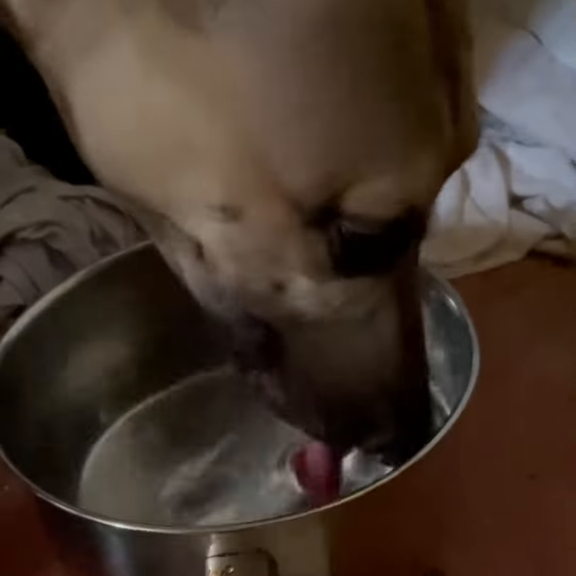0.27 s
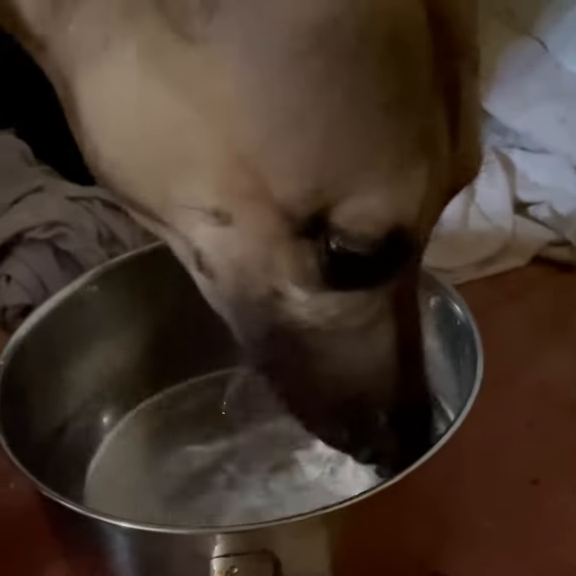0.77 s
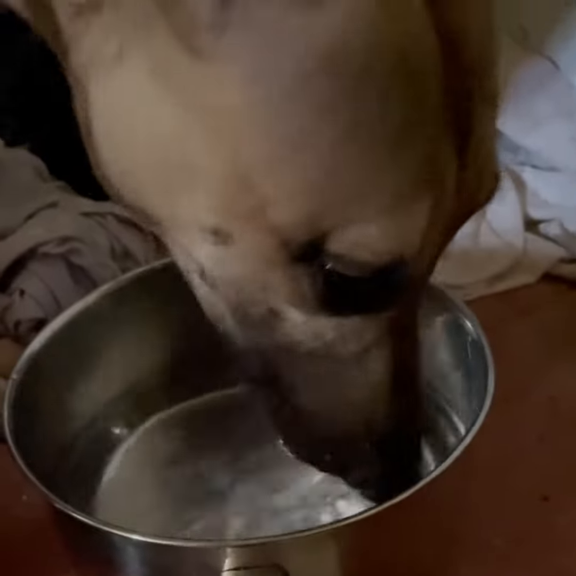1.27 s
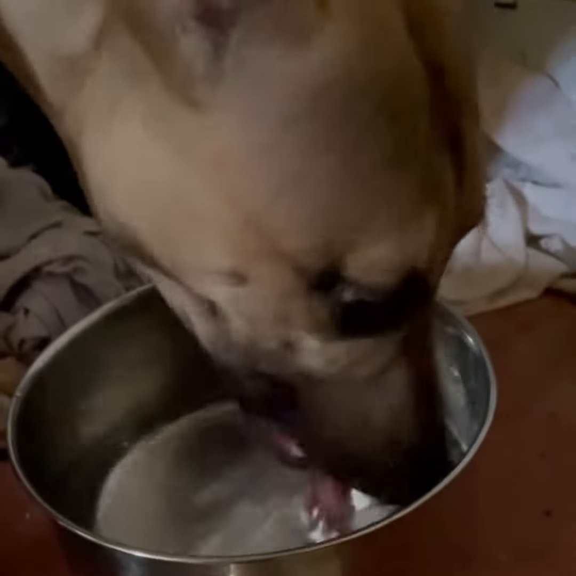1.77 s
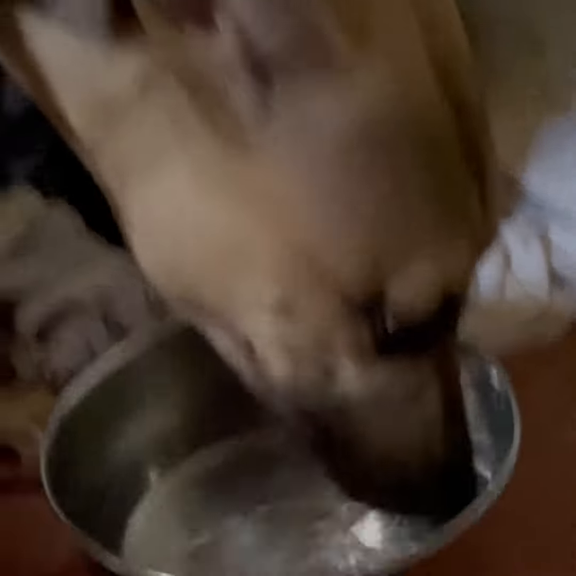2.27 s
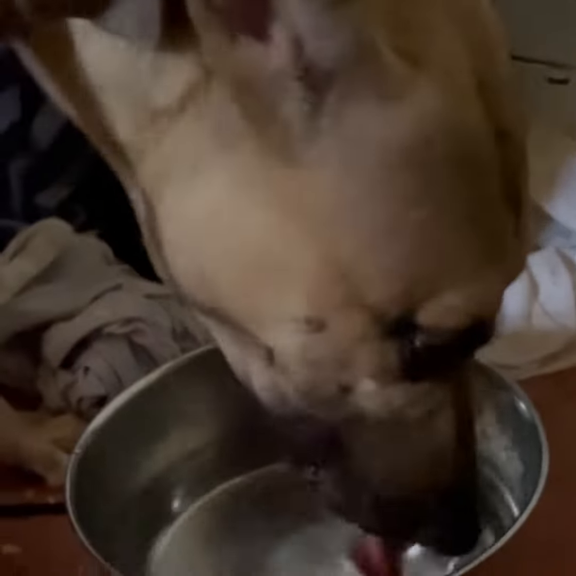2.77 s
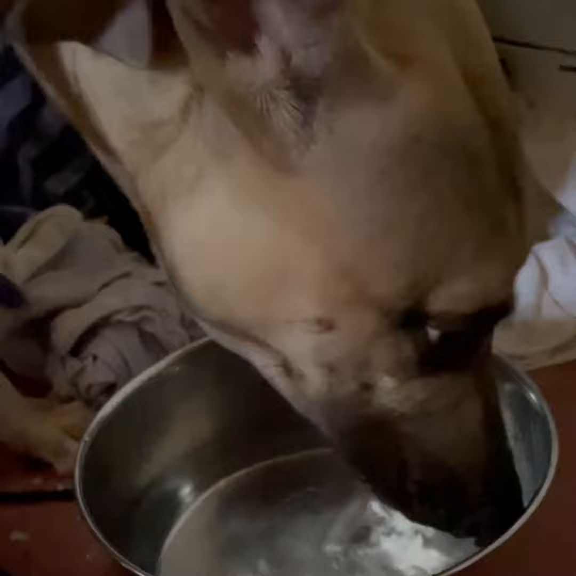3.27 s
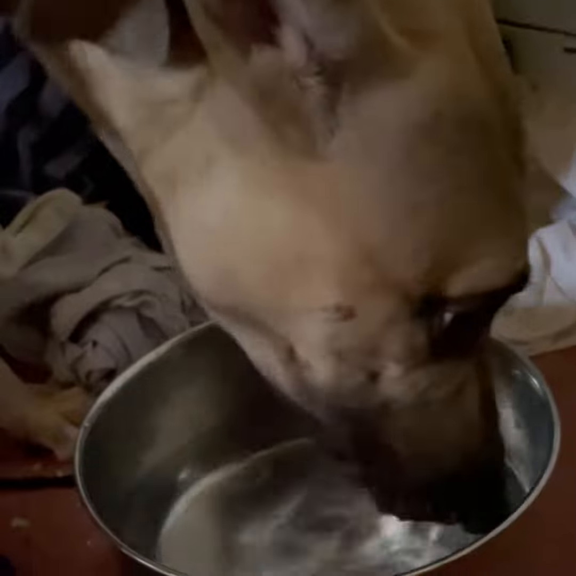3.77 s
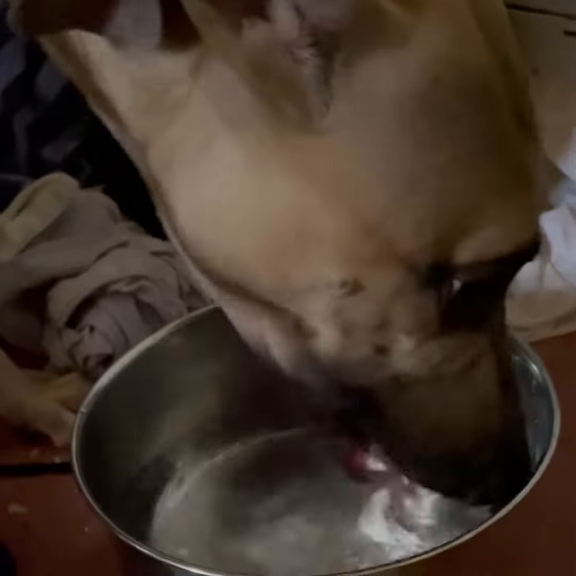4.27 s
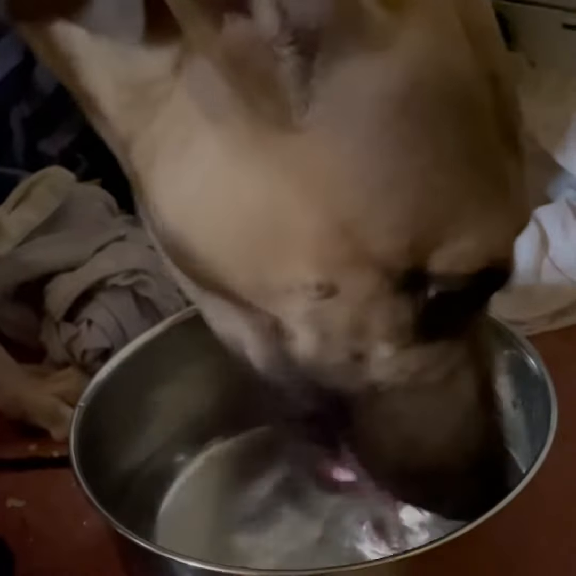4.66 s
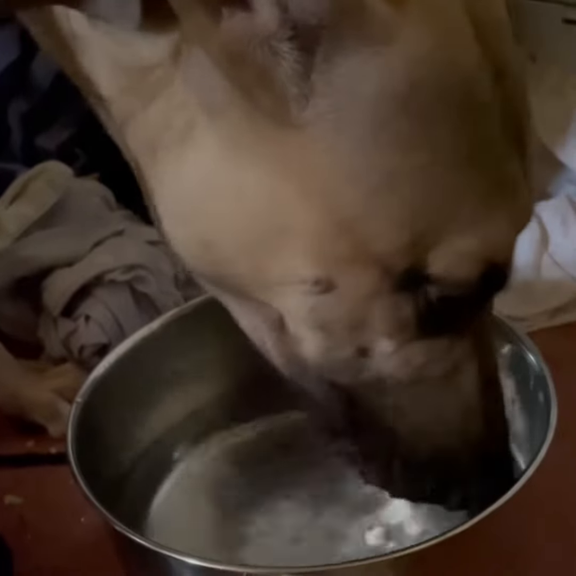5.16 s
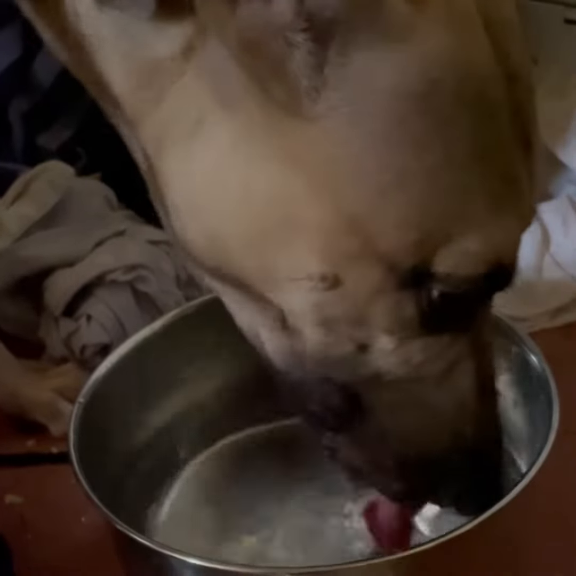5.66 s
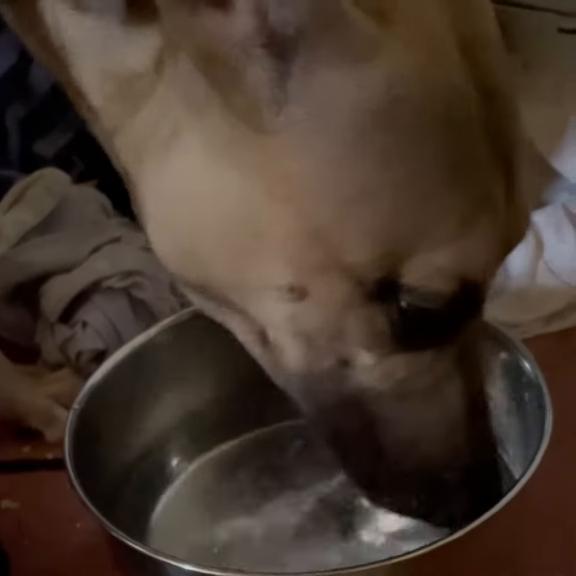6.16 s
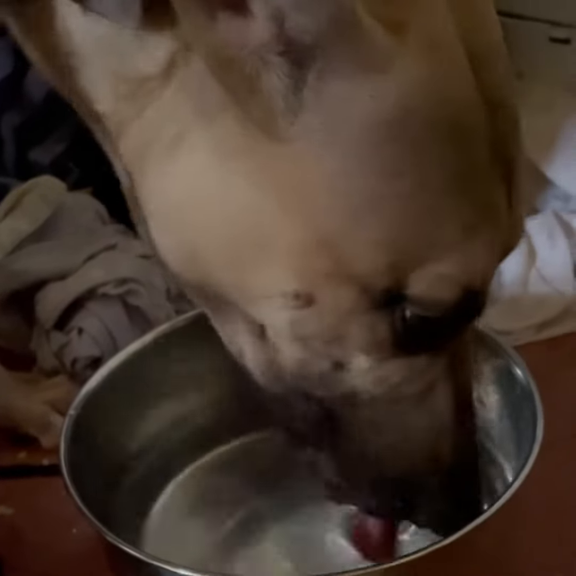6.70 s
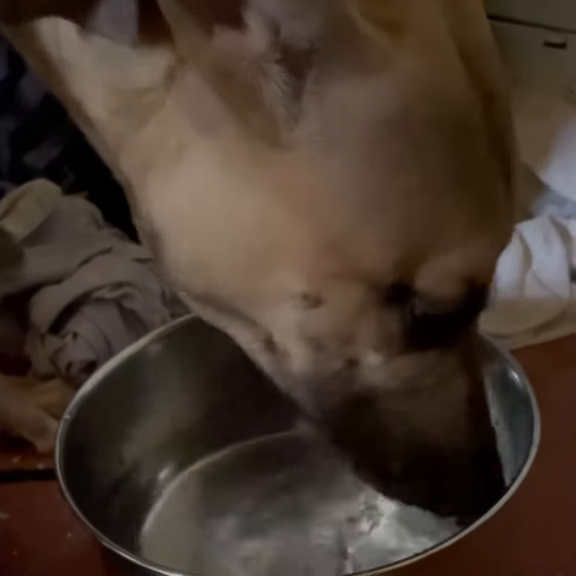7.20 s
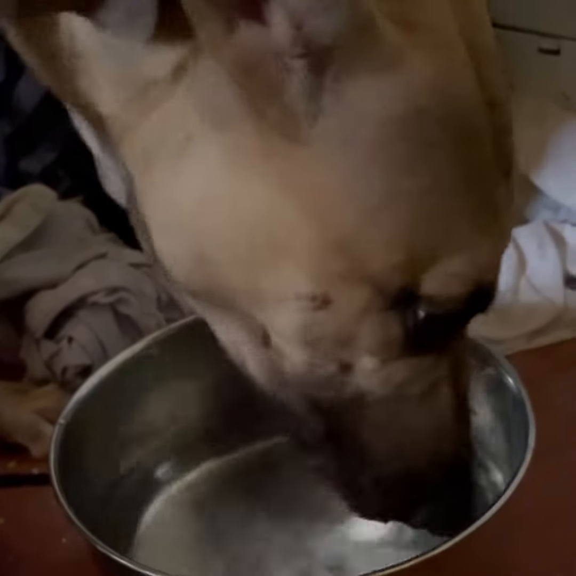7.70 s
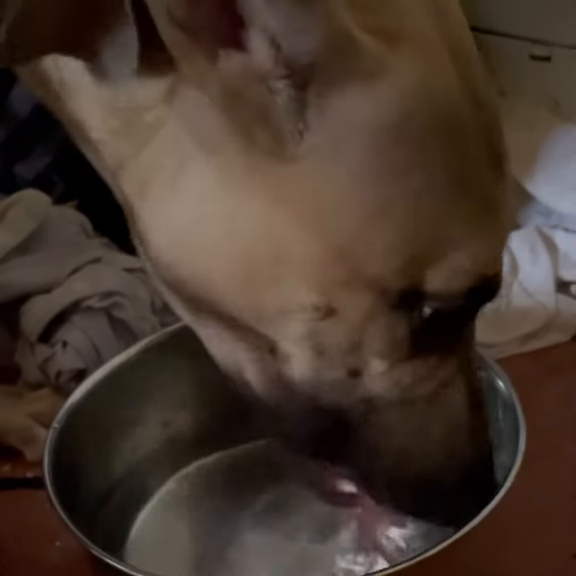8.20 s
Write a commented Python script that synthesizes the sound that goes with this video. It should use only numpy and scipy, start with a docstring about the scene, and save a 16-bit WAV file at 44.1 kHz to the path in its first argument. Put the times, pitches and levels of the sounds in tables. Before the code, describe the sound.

Steady, quick lapping of water, wet and detailed, with a slight hollow bowl resonance and very short room echo. Tongue strokes throw fine spray and round bubble plops, with sticky clicks between. Something hard touches the metal once near the start, a brief low rumble appears around a third of the way in, and lapping continues to the end over quiet hiss, in close stereo.

```python
"""A dog laps water from a metal bowl, close to two neighbouring microphone ports in a small room.
In each lap the lips smack open, the tongue dips in, lifts a column of water and the jaws shut on it: noise bursts
and bubble swarms, with trapped air pockets as short sines. Low bumps, perhaps swallows, come in runs.
Early on something hard clinks once on the metal (dying modes); later a low rumble (band noise) sets in and fades.
Filtered hiss and one faint wavering tone lie under it all."""
import sys
import numpy as np
from scipy import signal
from scipy.fft import rfft, irfft
from scipy.io import wavfile
from scipy.ndimage import uniform_filter1d

SR = 44100
rng = np.random.default_rng(int(sys.argv[2]) if len(sys.argv) > 2 else 0)


def persist_wave(psi):
    """Save psi, clipped to +-1, as 16-bit WAV."""
    counts = np.round(np.clip(psi, -1, 1) * 32767).astype(np.int16)
    wavfile.write(sys.argv[1], SR, np.atleast_2d(counts).T)


def ratio_of_db(decibels):
    """Turn decibels (scalar or array-like) into linear amplitude factors; 0 dB maps to 1."""
    return 10 ** (np.asarray(decibels, float) / 20)


N = 372204  # samples


def evened(x):
    """Scales to rms 1."""
    return x / np.sqrt(np.mean(x ** 2) + 1e-20)


def read(points, hz):
    """Interpolates a table of (freq_hz, value) on a log frequency axis."""
    freq_hz, value = np.transpose(points)
    return np.interp(np.log(hz + 1), np.log(freq_hz + 1), value)


def coloured(x, points):
    """Filters the last axis by a spectrum of (freq_hz, gain_db)."""
    n = x.shape[-1]
    gain = ratio_of_db(read(points, np.fft.rfftfreq(n, 1 / SR)))
    return irfft(rfft(x) * gain, n)


def add(mix, start_s, sound):
    """Adds a sound into the mix at a time, cropped to the mix."""
    at = round(start_s * SR)
    sound = sound[max(-at, 0):]
    part = mix[max(at, 0):][:len(sound)]
    part += sound[:len(part)]


def smooth_noise(samples):
    """Slow random control signal: white noise averaged over a window, rms 1."""
    return evened(uniform_filter1d(rng.standard_normal(N), size=samples))


def patchy(x, patchy_db):
    """Drifting colour: random gain patches hundreds of Hz wide and tens of ms long; rms 1."""
    z = signal.stft(x, nperseg=256)[2]
    patches = rng.standard_normal(z.T.shape).T
    patches = uniform_filter1d(patches, size=5, axis=0)
    patches = evened(uniform_filter1d(patches, size=10, axis=1))
    return evened(signal.istft(z * ratio_of_db(patchy_db * patches), nperseg=256)[1][:N])


def bubble(hz, length_s, rise=.18, start=.33, round_top=1.25, ring=0):
    """A sine that swells and dies on the scale of length_s, climbing as the air nears the surface."""
    t = np.arange(round((6 if ring else 3) * length_s * SR) + 9) / SR
    u = t / (start * length_s)
    swell = (u * np.exp(1 - u)) ** round_top
    swell = swell + ring * np.tanh(u / 2) ** 2 * np.exp(-u / 5)  # faint longer tail
    return swell * np.sin(2 * np.pi * hz * t * (1 + rise * (np.tanh(u / 3) - .5)))


def swarm(pitches_hz, gains, cycles, per_s, spread_db):
    """Many small bubbles at random moments, short and long by pitch, a few of them large; rms 1."""
    size = ratio_of_db(spread_db * np.minimum(rng.exponential(1, N), 4))
    size = size * (rng.random(N) < per_s / SR)
    kind = rng.integers(0, len(pitches_hz), N)
    out = np.zeros(N)
    for k, (hz, gain) in enumerate(zip(pitches_hz, gains)):
        length_s = cycles * 2 ** rng.uniform(-1.4, 1) / hz
        out += signal.oaconvolve(size * (kind == k), gain * bubble(hz, length_s))[:N]
    return evened(out)


# loudest air pockets under the tongue: start_s, level_db, pitch_hz, length_ms
POCKETS = [(0.0592, -35, 1120, 10), (0.0678, -32, 5150, 2.3), (0.177, -41.5, 1600, 5.7),
           (0.228, -44, 1180, 10), (0.263, -48, 1190, 9.6), (0.282, -35.5, 1250, 5.6),
           (0.362, -44, 538, 8.6), (0.3788, -35.5, 5040, 3.6), (0.376, -34.5, 3670, 6.8),
           (0.6342, -32.5, 5240, 1), (0.6614, -38.5, 2930, 3.6), (0.7225, -42, 551, 13.3),
           (0.961, -40, 5270, 6.5), (1.029, -41, 2320, 5.6), (1.298, -34, 1190, 1.7),
           (1.366, -43, 1810, 21), (1.471, -35.5, 1287, 13.4), (1.6766, -25, 1765, 5.2),
           (2.829, -40, 1580, 2.6), (1.683, -50, 2040, 50), (1.743, -23, 3430, 0.63),
           (1.7773, -37, 2470, 3.3), (1.8073, -42.5, 830, 21), (1.832, -38, 2740, 4.3),
           (1.835, -38.5, 235, 19.6), (2.067, -32, 1330, 1.9), (2.069, -34.5, 2710, 5),
           (2.3715, -36, 2060, 3.9), (2.382, -25, 1123, 7), (2.394, -33.5, 1860, 4.6),
           (2.397, -30.5, 502, 7.6), (2.4061, -33.5, 1235, 7.1), (2.4167, -22, 3160, 2),
           (2.495, -37.5, 5100, 5.5), (2.521, -24.5, 3030, 0.99), (2.7018, -31.5, 2160, 10.4),
           (2.701, -39, 5470, 13), (2.7065, -27.5, 3800, 1.6), (2.708, -30, 1110, 4.9),
           (2.719, -36.5, 1096, 6.4), (2.814, -37.5, 1210, 3.4), (2.817, -18.5, 3310, 1.9),
           (2.8904, -33.5, 2630, 1.9), (2.926, -30.5, 3980, 0.79), (3.118, -32, 1185, 6.6),
           (3.1465, -42, 1020, 5.1), (3.451, -36, 1160, 3.7), (3.4744, -35.5, 1170, 2.8),
           (3.541, -29, 1124, 8.5), (3.615, -37.5, 3030, 6.5), (3.6212, -38.5, 2215, 12),
           (3.664, -32.5, 2980, 2.3), (3.8764, -38, 1120, 3.9), (3.8829, -20, 3130, 3.3),
           (4.196, -45, 1085, 11), (4.217, -44, 940, 11.6), (4.392, -46.5, 1810, 6.5),
           (0.183, -53.5, 219, 24), (2.712, -38, 819, 13), (3.221, -46, 842, 11), (4.492, -46, 1060, 8),
           (4.622, -25, 2410, 3.2), (4.623, -31.5, 983, 6.8), (4.629, -30.5, 5470, 3.4),
           (4.629, -26, 4040, 3.1), (4.6283, -26, 3530, 5.1), (4.649, -34, 4190, 4.5),
           (4.6874, -36.5, 1834, 7.9), (4.6893, -36.5, 817, 15), (4.715, -39, 5480, 7.6),
           (4.716, -36.5, 3650, 9), (4.868, -35, 1825, 7.6), (4.949, -32, 3420, 6.2),
           (5.0059, -39.5, 805, 5.3), (5.0188, -40, 817, 11), (5.179, -42, 1710, 3.2),
           (5.206, -41.5, 1480, 2.5), (5.245, -43, 1100, 5.8), (5.2734, -40.5, 3460, 12.3),
           (5.3439, -40, 824, 13.5), (5.5712, -32, 1020, 9.6), (5.576, -36, 584, 7.8),
           (5.6514, -28, 5320, 1.4), (5.6589, -30.5, 1076, 9.4), (5.662, -33, 575, 10.6),
           (5.682, -29.5, 3480, 7.5), (5.704, -33, 3070, 3.7), (5.7456, -40.5, 802, 12),
           (5.7976, -35, 5250, 2.8), (5.984, -39, 1080, 11.4), (5.992, -39, 586, 5.2),
           (6.043, -35.5, 5500, 5.4), (6.0927, -43.5, 785, 14), (6.3574, -31, 974, 4.9),
           (6.416, -34.5, 1755, 5.8), (6.4646, -26, 602, 4.5), (6.66, -37, 1840, 3.6),
           (6.6792, -31, 865, 1.2), (6.8257, -38.5, 763, 8.6), (6.8638, -37, 3390, 4.2),
           (7.0171, -36.5, 1680, 7.6), (7.075, -29.5, 2720, 1.9), (7.076, -28.5, 1620, 1),
           (7.0871, -26, 3300, 2.9), (7.3958, -42, 1034, 8.6), (7.512, -34, 1040, 4),
           (7.515, -20.5, 5300, 0.68), (7.7231, -27.5, 1206, 8.3), (7.7255, -41, 510, 13),
           (7.733, -30.5, 3090, 1.3), (7.807, -30, 559, 7.7), (7.81, -29, 2000, 2),
           (7.9012, -32, 814, 10.4), (8.158, -39.5, 1795, 6.4), (8.181, -37.5, 1116, 8.3),
           (8.2472, -39.5, 716, 4.2), (8.2996, -44.5, 633, 11), (0.026, -43, 756, 5.6),
           (0.06, -43, 493, 11), (0.189, -45.5, 400, 7), (0.551, -42.5, 2150, 2.6), (1.764, -36, 5140, 2.2),
           (1.8345, -38.5, 5060, 2.4), (1.85, -38.5, 1190, 5.4), (2.053, -45, 970, 4.9),
           (2.066, -36, 3600, 6), (2.153, -44, 1060, 15), (2.392, -36.5, 4630, 2.5),
           (2.44, -39.5, 6070, 4.5), (2.723, -40, 3800, 7.6), (2.803, -38, 4800, 3.9),
           (2.881, -45.5, 810, 9), (3.471, -37, 5530, 2.7), (3.566, -37, 2620, 4.3),
           (3.681, -40, 4950, 3.7), (3.8725, -37, 3960, 3), (4.968, -41.5, 1775, 7.3),
           (5.574, -40.5, 2170, 5.4), (5.997, -34.5, 1850, 4.1), (6.078, -37, 5600, 1.9),
           (6.448, -34, 4900, 2.7), (6.463, -39, 2150, 4), (6.663, -38, 1070, 4.5), (6.728, -36, 1420, 2.9),
           (7.171, -41.5, 1116, 11), (7.402, -40.5, 1840, 2.4), (7.754, -40, 457, 2.9),
           (7.813, -32, 1066, 7.8), (7.838, -39.5, 2730, 5.1), (7.852, -39, 2400, 3),
           (7.953, -41, 597, 7.3), (8.142, -38, 1240, 2.9)]


def pockets():
    """Loud single bubbles, their walls trembling as the tongue tears past."""
    out = np.zeros(N)
    for start_s, level_db, pitch_hz, length_ms in POCKETS:
        add(out, start_s, ratio_of_db(level_db) * bubble(pitch_hz, length_ms / 1000, rise=.04, ring=.2))
    return out * (1 + .12 * smooth_noise(40))


# water film snapping during the stroke: start_s, treble_peak_db, body_rel_db (under 7 kHz)
TICKS = [(0.2892, -22, -13), (0.3042, -21.5, -12.5), (0.638, -33.5, -8), (0.984, -25.5, -12),
         [1.0989, -40, -19], [1.1179, -43, -13], [1.7424, -38, -11], [6.0342, -28.5, -17],
         (5.18, -38.5, -13), (5.335, -40.5, 0.5), [6.7625, -40, 7.5], [6.8803, -38, -19],
         [6.9681, -45.5, -8], [7.001, -44, 8.5], (1.4372, -32.5, -31), (1.6764, -39, 11.5),
         (2.0715, -34.5, 5.5), (2.6761, -34, 3.5), (2.815, -45.5, 16), (3.1473, -33.5, -7),
         (3.238, -33, -10), (3.6262, -25.5, -1), (4.2209, -32, -0.5), (4.9684, -30, 3), (5.215, -35.5, -8),
         (5.246, -35, -6), (5.2743, -30, -3.5), (5.5964, -31.5, -8), (5.6482, -41.5, 16),
         (6.358, -36.5, -17), (6.442, -38.5, 1), (6.7256, -46, 13), (7.0182, -31, -16), (7.18, -33.5, -2.5),
         (7.1972, -31.5, -34), (7.3872, -27, -12.5), (7.423, -22.5, -32), (7.5115, -34, 4.5),
         (7.7044, -39, -13), (0.176, -37.5, -20), (0.5666, -37.5, -10), (0.6594, -33.5, -1.5),
         (0.9727, -58, 23), (2.0862, -28, -20), (2.4603, -40.5, 4), (2.829, -33, -5), (4.015, -48, 15),
         (4.2385, -32.5, -5), (5.0674, -41.5, 5), (5.2969, -28.5, 0), (7.3297, -39.5, -11),
         (7.7408, -40.5, -8), (8.1948, -33, -18)]
# wet lips and tongue parting as a lap begins: start_s, treble_peak_db
SMACKS = [(0.158, -42), (0.205, -41.5), (0.525, -37), (1.231, -43.5), (1.956, -47.5), (2.297, -40),
          (3.011, -45), (3.344, -42.5), (3.392, -40), (3.7385, -42), (4.116, -46), (4.1392, -41),
          (4.4594, -44.5), (4.791, -46), (4.828, -48), (5.16, -41.5), (5.475, -50), (5.516, -40.5),
          (5.899, -46), (6.236, -42), (6.5928, -45.5), (6.6224, -37.5), (7.301, -45), (7.66, -40)]
SMACK_BODY_REL_DB = -12


def ticks():
    """Film ticks and lip smacks: a sharp crack that crumbles into a few milliseconds of hiss."""
    out, t = np.zeros(N), np.arange(1024) / SR
    hz = np.fft.rfftfreq(1024, 1 / SR)
    low = 1 / (1 + (hz / 7000) ** 8)
    colour = ratio_of_db(read(SPRAY, hz))
    rows = TICKS + [(start_s, peak_db, SMACK_BODY_REL_DB) for start_s, peak_db in SMACKS]
    noises = rng.standard_normal((len(rows), 1024))
    for (start_s, peak_db, body_rel_db), noise in zip(rows, noises):
        burst = noise * (np.exp(-t / .0011) + .3 * np.exp(-t / .007))
        burst = np.roll(burst, 64)  # room for the filters to ring ahead of the onset
        spectrum = rfft(burst) * colour
        crack = irfft(spectrum * (1 - low))
        body = irfft(spectrum * low)
        tick = crack / abs(crack).max() + ratio_of_db(body_rel_db) * body / abs(body).max()
        add(out, start_s - 64 / SR, ratio_of_db(peak_db) * tick)
    return out


# resonances of the bowl's air: centre_hz, width_hz, gain_db
BOWL = [(225, 70, -10), (520, 90, 3), (810, 60, -9), (1170, 150, 6), (1820, 140, 6), (2200, 220, 1)]


def slosh():
    """Small bubbles gather at the resonances of the bowl's air; spray is finer and brighter."""
    hz = np.geomspace(190, 4200, num=70)
    bowl = sum(ratio_of_db(gain_db) / (1 + (2 * (hz - centre_hz) / width_hz) ** 2) ** 0.67
               for centre_hz, width_hz, gain_db in BOWL)
    low, high = hz < 700, hz > 950
    gurgle = swarm(hz[low], bowl[low], 2.96, 400, 3.2)
    water = patchy(swarm(hz[~low], bowl[~low], 8, 2400, 3.6), patchy_db=3.5)
    trickle = patchy(swarm(hz[high], bowl[high], 9, 700, 3), patchy_db=5)
    trickle = ratio_of_db(murmur() - 2) * trickle
    fine_hz = np.geomspace(2800, 7000, num=30)
    fizz = swarm(fine_hz, ratio_of_db(read(SPRAY, fine_hz)), 12, 3000, 4)
    spray = patchy(spatter() + 0.61 * fizz, patchy_db=5.0)
    return (np.array([gurgle, water, spray]) * stirring()).sum(0) + trickle


# tongue dipping in: top_s, slosh_db, spray_db
DIPS = [(0.192, -59, -71), (0.548, -65, -57), (0.888, -90, -57), (1.309, -47, -58.5), (1.684, -52, -53.5),
        (2.017, -53, -61), (2.716, -47.5, -48), (3.053, -62.5, -58), (3.463, -48.5, -58),
        (4.541, -48.5, -56.5), (4.889, -72, -59), (5.238, -51.5, -79), (5.569, -49, -51.5),
        (6.004, -46, -45.5), (6.286, -63, -60), (6.685, -48, -62), (7.034, -52.5, -51.5),
        (7.74, -54.5, -52.5), (8.122, -51.5, -58.5), (8.44, -77, -55.5)]
# tongue lifting the water: top_s, slosh_db, spray_db
LIFTS = [(0.0, -59, -46), (0.301, -56, -55), (0.659, -55.5, -51.5), (0.996, -54, -50.5),
         (1.405, -49.5, -47), (1.774, -53.5, -45.5), (2.083, -54, -50.5), (2.417, -48, -44),
         (2.833, -57.5, -46), (3.173, -54, -52.5), (3.55, -51, -48.5), (3.899, -62, -44.5),
         (4.238, -59.5, -52), (4.639, -53.5, -46), (4.977, -52.5, -49), (5.3, -53.5, -50.5),
         (5.678, -50, -45), (6.047, -63, -53), (6.385, -51, -49), (6.795, -48.5, -47.5),
         (7.104, -53, -46.5), (7.431, -51.5, -49), (7.821, -51, -43), (8.179, -53, -47)]
# jaws shutting on the water: top_s, slosh_db, spray_db, gurgle_db
SHUTS = [(0.058, -52, -49.5, -57), (0.38, -55, -49, -61), (0.738, -58.5, -50.5, -65.5),
         (1.082, -56, -53, -58.5), (1.51, -53.5, -54.5, -62), (1.839, -46, -54.5, -51),
         (2.16, -50.5, -53, -57), (2.509, -47, -48, -52), (2.902, -50, -56, -52),
         (3.237, -54.5, -54.5, -62), (3.658, -49, -43.5, -56.5), (3.98, -49.5, -50, -66),
         (4.317, -57, -54, -65), (4.726, -49, -49.5, -54.5), (5.044, -51.5, -57.5, -51.5),
         (5.372, -49.5, -51.5, -48.5), (5.773, -46, -46, -47), (6.112, -50, -51, -51.5),
         (6.462, -49.5, -52, -58), (6.869, -59, -55, -54), (7.178, -54, -52, -49.5),
         (7.519, -53.5, -50, -50.5), (7.929, -53, -48, -54), (8.263, -51.5, -51, -63)]
# shared by all dips, by all lifts: length_ms, gurgle_rel_db (to slosh)
DIP = (57, -9.5)
LIFT = (89, -12)
# gurgle, slosh, spray between splashes: level_rel_db (to murmur)
CALM_REL_DB = [-10.5, -13, -14.5]
SHUT_MS = 70
DRIBBLE_DELAY_S, DRIBBLE_MS, DRIBBLE_REL_DB = 0.041, 60, -21.5  # spray that follows a smack


def stirring():
    """Gains of gurgle, slosh, spray: splashes swell fast and settle more slowly; powers add up."""
    splashes = []
    for rows, (length_ms, gurgle_rel_db) in ((DIPS, DIP), (LIFTS, LIFT)):
        for top_s, slosh_db, spray_db in rows:
            splashes.append((top_s, length_ms, slosh_db + gurgle_rel_db, slosh_db, spray_db))
    for top_s, slosh_db, spray_db, gurgle_db in SHUTS:
        splashes.append((top_s, SHUT_MS, gurgle_db, slosh_db, spray_db))
    for start_s, peak_db in SMACKS:
        spray_db = peak_db + DRIBBLE_REL_DB
        splashes.append((start_s + DRIBBLE_DELAY_S, DRIBBLE_MS, -np.inf, -np.inf, spray_db))
    power = np.zeros((N, 3))
    for top_s, length_ms, *levels_db in splashes:
        u = np.arange(-1.5, 4, 1000 / length_ms / SR)  # time from the top, in lengths
        shape = np.where(u < 0, np.exp(-(u / 0.27) ** 2), np.exp(-u / 0.24))
        patter = 0.013 * (u > 0) * np.exp(-u / 0.77)  # the spray keeps falling back
        shapes = np.c_[shape, shape, shape + patter]
        add(power, top_s - 1.5 * length_ms / 1000, shapes * ratio_of_db(levels_db) ** 2)
    calm = ratio_of_db(np.array(CALM_REL_DB)[:, None] + murmur())
    return np.sqrt(power.T + calm ** 2)


# murmur the water keeps up between splashes: time_s, level_db
CALM = [(0.0, -71), (0.11, -60), (0.99, -66.5), (1.88, -61.5), (2.42, -61), (2.56, -62.5), (3.9, -59),
        (4.09, -66.5), (4.54, -60), (5.57, -59.5), (6.04, -65.5), (6.51, -58), (8.18, -63.5), (8.44, -66.5)]


def murmur():
    """Reference level in dB of the water between splashes, linear between points."""
    return np.interp(np.arange(N) / SR, *np.transpose(CALM))


# colour of spray, ticks and smacks: freq_hz, gain_db
SPRAY = [(1500, -16.5), (3000, 1), (5300, -0.5), (6700, -3), (7900, -8.5), (9200, -8.5), (13000, -11.5),
         (13800, -25), (14500, -7.5), (15600, -11), (16600, -44)]


def spatter():
    """Tiny droplets, dull and bright: clicks that each leave a short hiss, over a fine mist."""
    size = ratio_of_db(5 * np.minimum(rng.exponential(1, (3, N)), 4))
    size = size * (rng.random((3, N)) < 420 / SR)
    drops = size[:2] + 1.2 * size[2]  # the third set strikes both colours
    hissing = 0.15 + signal.lfilter([1], [1, -np.exp(-1 / (0.001 * SR))], drops)
    dull, bright = coloured(rng.standard_normal((2, N)) * hissing, SPRAY)
    split = signal.firwin(63, 7500, fs=SR)  # dull below 7500 Hz, bright above
    return evened(bright + signal.oaconvolve(dull - bright, split, "same"))


# one touch on the metal by something hard, perhaps a tooth: start_s, level_db
CLINK = (1.1185, -29.5)
# modes of the metal: freq_hz, level_rel_db, t60_s
METAL = [(3020, -21, .12), (3494, -17, .09), (4570, -8, .1), (4759, 1, .045), (4974, -3, .035),
         (5173, -1, .05), (5626, -23, .09)]


def clink():
    """Dying modes of the metal, beating against one another."""
    out, t = np.zeros(N), np.arange(SR // 4) / SR
    start_s, level_db = CLINK
    ring = sum(ratio_of_db(level_rel_db - 60 * t / t60_s) * np.sin(2 * np.pi * freq_hz * t)
               for freq_hz, level_rel_db, t60_s in METAL)
    add(out, start_s, ratio_of_db(level_db) * np.tanh(t / 0.0029) * ring)
    return out


# soft low bumps, in runs about every third lap: start_s, level_db, pitch_hz (settled)
BUMPS = [(0.05, -59, 110), (1.16, -55, 98), (1.324, -48, 94), (1.408, -42, 93), (1.495, -52, 98),
         (1.837, -48, 96), (2.133, -51, 54.5), (2.56, -50, 110), (2.719, -34, 99), (2.854, -50.5, 93),
         (2.891, -50, 92), (3.338, -40, 88), (3.486, -47, 92), (3.59, -48, 88), (4.407, -46.5, 86.5),
         (4.63, -41, 90), (4.774, -53, 93), (5.464, -42, 87), (5.603, -49.5, 94), (5.692, -46, 101),
         (6.539, -41, 90.5), (6.689, -48, 94), (6.78, -46, 97), (7.599, -40.5, 89), (7.832, -43.5, 95)]
RUN_S = 0.58  # reach of the fainter bumps around the loud ones
BUMP_CYCLES = 0.82  # width of the bell-shaped swell


def bumps():
    """A few soft cycles of falling pitch, with a swarm of fainter ones around them."""
    out, near, t = np.zeros(N), np.zeros(N), np.arange(SR // 10) / SR
    sag_s = -.006 * np.exp(-t / .008)  # pitch starts high and drops
    for start_s, level_db, pitch_hz in BUMPS:
        bell = np.exp(-((t - .02) * pitch_hz / BUMP_CYCLES) ** 2 / 2)
        add(out, start_s, ratio_of_db(level_db) * bell * np.sin(2 * np.pi * pitch_hz * (t + sag_s)))
        near = np.maximum(near, np.exp(-((np.arange(N) / SR - start_s) / RUN_S) ** 2))
    faint = swarm(np.geomspace(66, 150, num=8), np.geomspace(1, .5, num=8), 2.9, 110, 2.5)
    return out + ratio_of_db(-71) * (.16 + near) * faint


# low rumble: level_db (before the fade), centre_hz, width_hz, fade_s
RUMBLE = (-54, 355, 329, 0.37)
RUMBLE_START_S = 2.48


def rumble():
    """One low hollow rumble, patchy band noise, that sets in and dies away."""
    level_db, centre_hz, width_hz, fade_s = RUMBLE
    t = np.maximum(np.arange(N) / SR - RUMBLE_START_S, 0)
    edges_hz = [centre_hz - width_hz / 2, centre_hz + width_hz / 2]
    band = signal.butter(3, edges_hz, "bandpass", fs=SR, output="sos")
    noise = patchy(signal.sosfilt(band, rng.standard_normal(N)), patchy_db=3.5)
    return ratio_of_db(level_db) * noise * np.tanh(t / 0.022) * np.exp(-(t / fade_s) ** 2)


# colour of the hiss: freq_hz, gain_db
HISS = [(30, -44), (91, -12), (300, -19), (750, -40), (1170, -11), (1830, 10), (3400, 6), (6000, -61),
        (11000, -29), (16000, -40)]
# faint tone: freq_hz, rms_db
HUM = [(1803, -84)]
HISS_SCALE_DB = -73.5  # ahead of the shared and separate weights


def background():
    """Steady hiss, partly shared by the ports, and a faint tone of wavering pitch."""
    shared, left, right = evened(coloured(rng.standard_normal((3, N)), HISS))
    hiss = ratio_of_db(HISS_SCALE_DB) * (0.12 * shared + 0.73 * np.array([left, right]))
    waver_s = np.cumsum(1 + 0.0033 * smooth_noise(4000)) / SR
    hum = sum(np.sqrt(2) * ratio_of_db(rms_db) * np.sin(2 * np.pi * freq_hz * waver_s)
              for freq_hz, rms_db in HUM)
    return hiss + hum


# phase between the ports: freq_hz, left_lead_rad
LEAD = [(0, 0), (1200, -1.2), (2000, .1), (3200, 1.7), (3800, .2), (5200, -.1), (7500, 3.1), (12000, 7.3),
        (13800, 9.3), (14800, 9.7), (15600, 10.5)]
# level between the ports: freq_hz, left_over_right_db
SHADE = [(700, 0.5), (1300, 0.5), (2400, -6), (3500, 0), (4600, -1), (6000, -0.3)]


def ports(x):
    """Sound reaches the two openings with lag and shading, wandering fast between two spots in the bowl."""
    hz = np.fft.rfftfreq(N, 1 / SR)
    spot = np.pi / 4 * (1 + np.tanh(2 * smooth_noise(900)))
    apart_rad = 1.26 * np.exp(-((hz - 4000) / 1300) ** 2) + 0.56 * np.tanh(hz / 300)
    out = 0
    for share, side in ((np.cos(spot), 1), (np.sin(spot), -1)):
        lead_rad = np.interp(hz, *np.transpose(LEAD)) + side * apart_rad
        half = ratio_of_db(.5 * read(SHADE, hz)) * np.exp(.5j * lead_rad)  # half to each port
        out = out + irfft(rfft(x * share) * np.array([half, 1 / half]), N)
    return out


# echoes inside the bowl: freq_hz, t60_s
WALLS = [(500, 0.16), (8000, 0.019)]
# echoes of the room: freq_hz, t60_s
ROOM = [(1000, 0.042), (4000, 0.067), (12000, 0.026)]


def echoes(x, t60s):
    """Sparse random taps, other ones at each port, each band dying at its own speed."""
    taps = np.zeros((2, SR // 2))
    at = np.arange(60, SR // 2 - 20, 20) + rng.integers(0, 20, (2, (SR // 2 - 61) // 20))
    np.put_along_axis(taps, at, rng.choice([-1., 1.], at.shape), 1)
    hz, t, z = signal.stft(taps, SR, nperseg=128)
    decay = ratio_of_db(-60 * t / read(t60s, hz)[:, None])
    tail = signal.istft(z * decay, SR, nperseg=128)[1]
    return signal.oaconvolve(x[None], tail / np.linalg.norm(tail[0]), axes=1)[:, :N]


def scene():
    """Water, clink and rumble go direct, off the bowl and through the room; bumps nearly alike to both ports."""
    water = pockets() + ticks() + slosh() + rumble() + clink()
    reflected = ratio_of_db(-17.5) * echoes(water, WALLS) + ratio_of_db(-12.5) * echoes(water, ROOM)
    return ports(water) + reflected + bumps() * ratio_of_db([[1.4], [-.6]]) + background()


def band_limit(x):
    """A steep low-pass at the top of the band."""
    return signal.sosfilt(signal.butter(12, 17300, fs=SR, output="sos"), x)


LOW_CUT_HZ, EDGE_HZ = 36, 16900


def record(dry):
    """Bass roll-off, then a steep treble limit."""
    low_cut = signal.butter(2, LOW_CUT_HZ, "highpass", fs=SR, output="sos")
    edge = signal.firwin(255, EDGE_HZ, window=("kaiser", 9), fs=SR)
    mix = signal.oaconvolve(signal.sosfilt(low_cut, dry), edge[None], "same")
    return band_limit(mix)


dry = scene()
out = record(dry)
persist_wave(out)
```